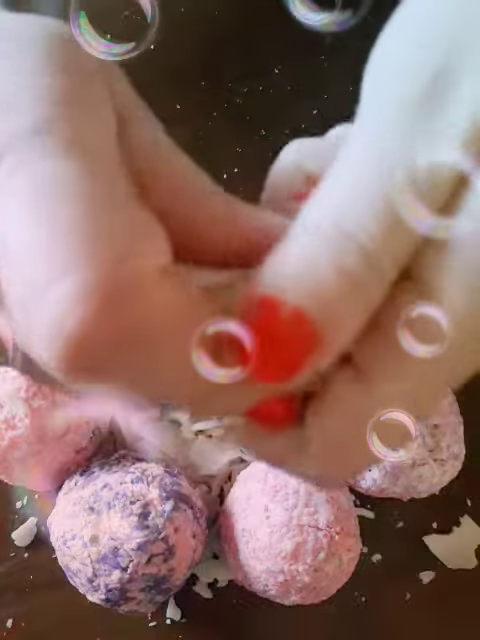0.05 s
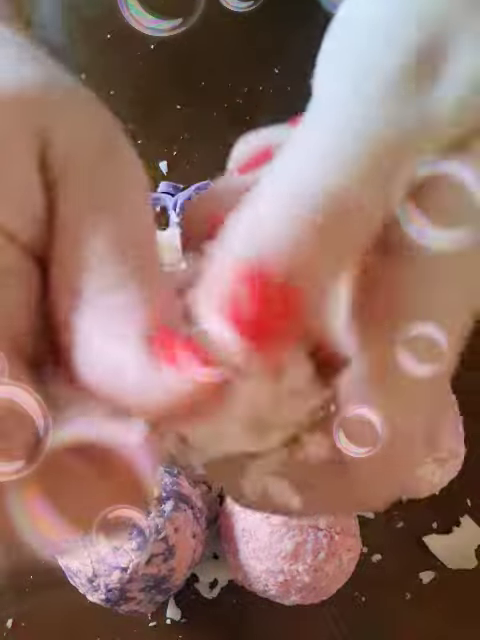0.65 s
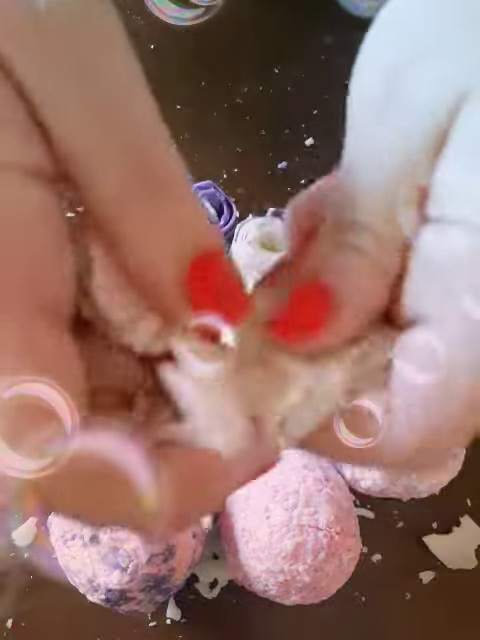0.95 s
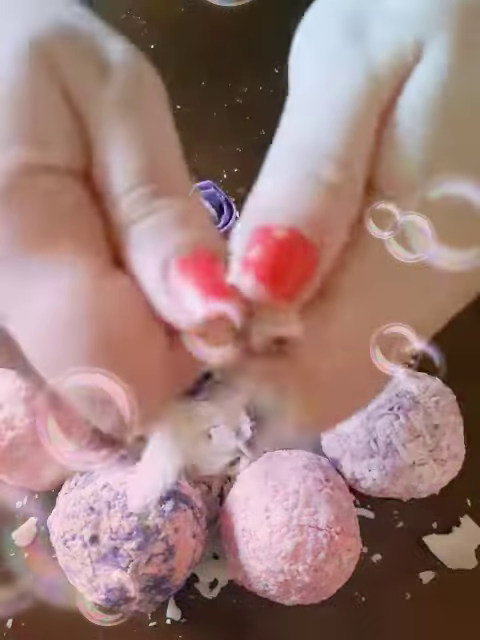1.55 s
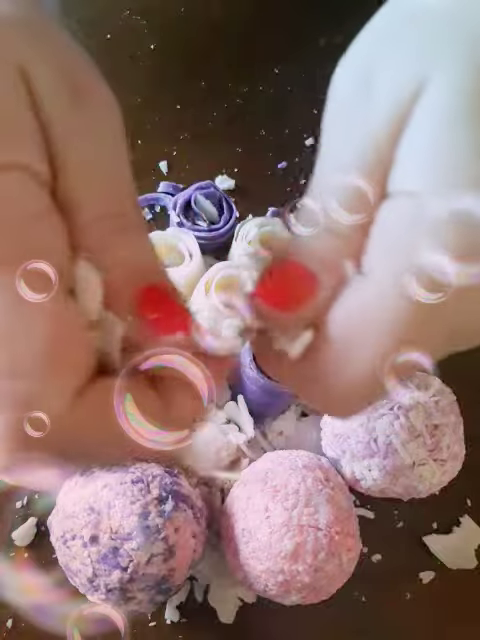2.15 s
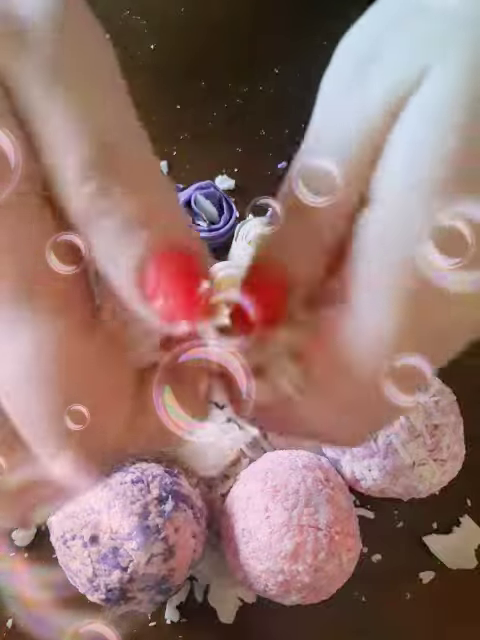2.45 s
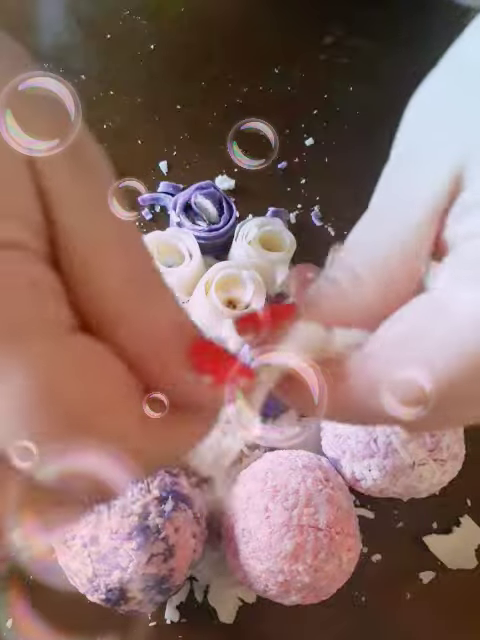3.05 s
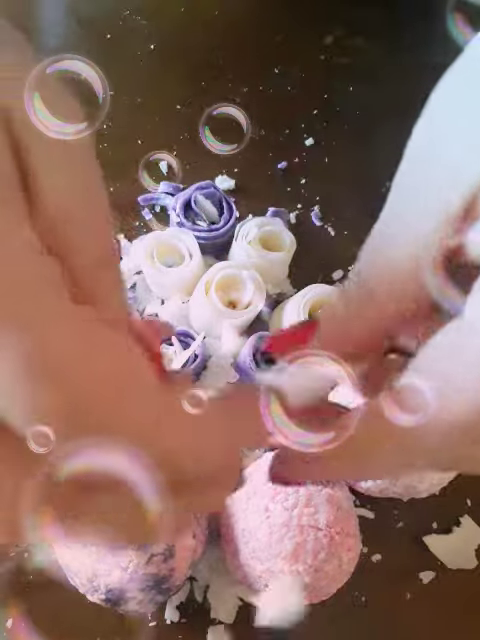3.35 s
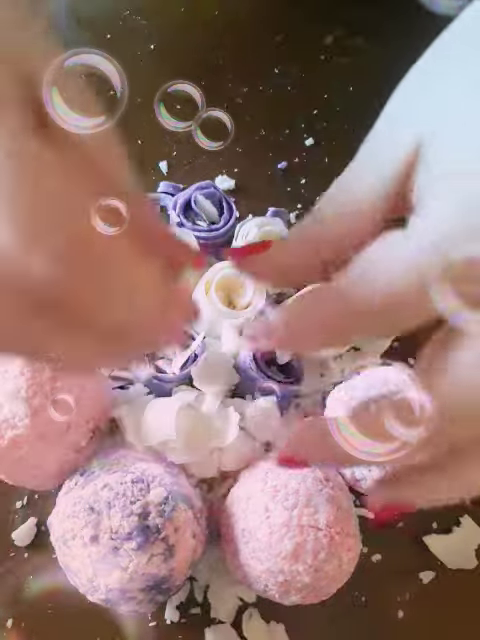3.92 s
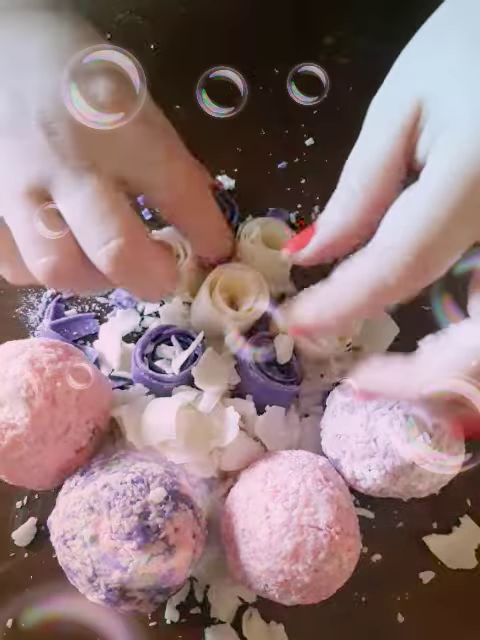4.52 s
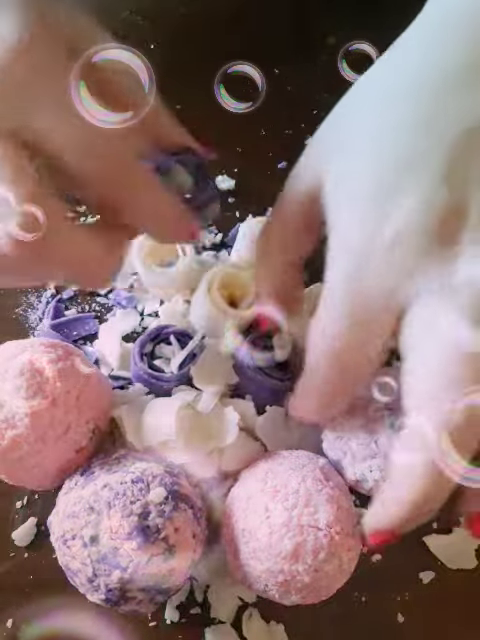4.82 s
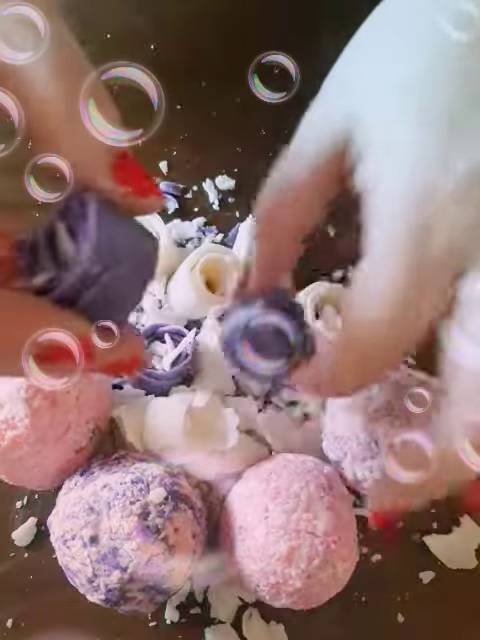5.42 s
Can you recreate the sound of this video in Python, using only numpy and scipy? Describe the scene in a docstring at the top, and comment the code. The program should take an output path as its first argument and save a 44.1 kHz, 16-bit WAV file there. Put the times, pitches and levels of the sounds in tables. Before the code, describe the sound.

Dry soap curls are crushed between fingers close to the microphone in a small, quiet room with almost no echo. It begins with faint rubbing and a few small ticks. At about 0.9 seconds crisp snapping starts, with a sharp crack near 1 second, and dense crackling and crunching continues in repeated squeezes. Skin hisses softly over the soap, and pieces knock dully on the table, most clearly at about 1.6 seconds. The crumbling eases slightly from 2 to 3 seconds, then sharper snaps and several light knocks come between 3.1 and 3.9 seconds. After that it is much quieter. From 4.1 to 4.4 seconds a soap ball scrapes along the table with a small knock, then rocks to rest with soft, low bumps around 4.6 seconds. From 4.8 seconds fingers rustle among the curls with a few faint ticks, fading by about 5.6 seconds.

```python
"""Dry soap curls snap and crumble as fingers crush them close to a microphone.
Each brittle fracture excites the resonances of a thin shell; crumbs break in clumps under pressure,
skin rubs and hisses, and dull knocks ring the table. Then a soap ball scrapes along the table and
settles, and the fingers rustle among the curls. A small, quiet room answers faintly; the sound is mono."""
import sys
import numpy as np
from scipy import signal
from scipy.fft import rfft, irfft, next_fast_len
from scipy.io import wavfile

SR = 44100
rng = np.random.default_rng(int(sys.argv[2]) if len(sys.argv) > 2 else 0)


def wav_out(sig):
    """Save sig, one row per channel (or a flat mono array), as 16-bit PCM at SR to the path in sys.argv[1]."""
    wavfile.write(sys.argv[1], SR, np.round(np.clip(np.atleast_2d(sig).T, -1, 1) * 32767).astype(np.int16))


N = 250488
FRAME = 2048  # samples in one fracture or filter response
ONSET = FRAME // 4  # sample of that frame at which a shell breaks

# modes of the table top: (frequency [Hz], relative level [dB], decay time T60 [s])
TABLE_MODES = [(140.5, -6.5, 0.29), (260.4, -10, 0.21), (274.8, 1.5, 0.27), (495.2, 2, 0.16)]
# spectrum of fine soap dust: (frequency [Hz], relative level [dB])
DUST_SPECTRUM = [(2500, -33), (4500, 9), (5500, -3), (7500, -1), (8700, -16.5), (12000, -10), (16000, -6)]
# texture under the fingers: (time [s], rub weight [dB], flake weight [dB], dust weight [dB])
TEXTURE = [(0, 6.5, 6, 5), (.7, -3.5, -14, 0), (1.3, -2, -2, 1.5), (3.8, -2, -2.5, -0.5),
           (4.5, -0.5, -1.5, 2), (4.88, 3, 3.5, -8), (5.6, 1.5, 4, 1)]


def amp(db):
    """Amplitude grows tenfold every 20 dB."""
    return 10 ** (np.asarray(db) / 20)


def unit(x):
    """Normalisation to an rms of 1."""
    return x / np.sqrt(np.mean(x ** 2) + 1e-20)


def along(points, hz):
    """Interpolation of (frequency [Hz], value) points on a logarithmic axis."""
    freqs, values = np.transpose(points)
    return np.interp(np.log(hz + 1), np.log(freqs + 1), values)


def curves(rows):
    """Linear interpolation in time: one envelope for each column after the first."""
    times, *columns = np.transpose(rows)
    return [np.interp(np.arange(N) / SR, times, column) for column in columns]


def wobble(knots_per_s):
    """Random modulation: a curve drifts between Gaussian knots."""
    knots = rng.standard_normal(int(N * knots_per_s / SR) + 2)
    return np.interp(np.arange(N) * knots_per_s / SR, np.arange(len(knots)), knots)


def add(track, start_s, x):
    """Superposition: x joins the track at start_s."""
    i = max(0, round(start_s * SR))
    track[i:i + len(x)] += x[:max(0, len(track) - i)]


def coloured(x, spectrum):
    """Minimum-phase filtering by (frequency [Hz], gain [dB]) points."""
    gain = amp(along(spectrum, np.fft.rfftfreq(FRAME, 1 / SR)))
    cepstrum = irfft(np.log(gain))
    cepstrum[1:FRAME // 2] *= 2
    cepstrum[FRAME // 2 + 1:] = 0
    return signal.oaconvolve(x, irfft(np.exp(rfft(cepstrum))))[:len(x)]


def resonant(x, hz, q):
    """Forced response of one damped resonator; q is held at 1 or more."""
    return signal.lfilter(*signal.iirpeak(min(hz, SR / 3), max(q, 1), SR), x)


def ring(modes, attack_s, scatter_db):
    """Free vibration: a struck body sounds as a sum of exponentially decaying modes."""
    t = np.arange(SR // 2) / SR
    waves = sum(amp(db + rng.normal(0, scatter_db) - 60 * t / t60) * np.sin(2 * np.pi * hz * t)
                for hz, db, t60 in modes)
    return waves * (1 - np.exp(-t / attack_s))


def grains(per_s, hz, spread, cycles, size_db):
    """Shot noise: tiny breaks at random times, each a heavily damped wave at its own pitch."""
    count = int(per_s * N / SR)
    when, strength, place, phase = rng.random((count, 4), np.float32).T
    pitch = hz * np.exp(spread * (2 * place - 1))[:, None]
    t = np.arange(128, dtype=np.float32) / SR
    age = t * pitch / cycles
    size = amp(size_db * np.minimum(-np.log(1 - strength), 3.6))
    envelope = size[:, None] * np.sqrt(pitch) * age * np.exp(-age)
    waves = envelope * np.sin(2 * np.pi * (pitch * t + phase[:, None]))
    index = (when * N).astype(int)[:, None] + np.arange(len(t))
    return unit(np.bincount(index.ravel(), waves.ravel(), N)[:N])


def hush():
    """Ambient noise: a steady random background, strongest in the bass."""
    # spectrum of the quiet room: (frequency [Hz], relative level [dB])
    spectrum = [(25, -18.5), (105, 5.5), (210, 4), (390, -10.5), (510, -9.5), (700, -16.5), (2200, -24.5),
                (4400, -20.5), (7500, -21.5), (16000, -29.5)]
    return amp(-62) * unit(coloured(rng.standard_normal(N), spectrum))


def reverberation(x):
    """Wall reflections build into a diffuse tail, in which the top treble dies first."""
    # reverberation of the room: (frequency [Hz], decay time T60 [s])
    decay_times = [(150, 0.3), (1500, 0.096), (5000, 0.13), (14000, 0.03)]
    hz, t, noise = signal.stft(rng.standard_normal(SR // 2), SR, nperseg=256)
    decay = amp(-60 * t / along(decay_times, hz)[:, None])
    tail = signal.istft(noise * decay, SR, nperseg=256)[1]
    tail *= 1 - np.exp(-np.arange(len(tail)) / SR / 0.042)
    return signal.fftconvolve(x, tail / np.linalg.norm(tail))[:N]


def ball():
    """Friction and soft impact: a rough soap ball scrapes along the table, then rocks to rest."""
    # envelope of the slide: (time [s], level [dB])
    slide = [(4.10, -109), (4.14, -56), (4.20, -48.5), (4.27, -57.5), (4.31, -46), (4.35, -64), (4.39, -85)]
    # spectrum of the scrape: (frequency [Hz], relative level [dB])
    spectrum = [(70, -39), (150, 12.5), (400, 3), (700, -10), (1500, -12.5), (2200, -20), (5000, -64)]
    # bumps of the settling ball: (time [s], level [dB])
    bumps = [(4.569, -32), (4.589, -34), (4.619, -29), (4.633, -32), (4.669, -33), (5.139, -38)]
    # table modes under a soft weight: (frequency [Hz], relative level [dB], decay time T60 [s])
    loaded_modes = [(64.1, -19.5, 0.64), (106, -11, 0.18), (148, -3, 0.11), (206.6, -6, 0.078)]
    roughness = grains(per_s=1400, hz=1180, spread=0.69, cycles=0.42, size_db=-0.5)
    out = amp(curves(slide)[0]) * unit(coloured(roughness, spectrum))
    for start, db in bumps:
        add(out, start, amp(db) * ring(loaded_modes, attack_s=0.00445, scatter_db=2))
    return out


def knocks():
    """Impact excitation: a strongly damped thud leaves the table's modes ringing faintly."""
    # a curl gives way or a piece meets the table: (time [s], relative level [dB], frequency [Hz])
    impacts = [(.863, -39.5, 343), (1.243, -35, 280), (1.635, -17, 262), (1.646, -24, 262),
               (1.691, -24.5, 255), (1.778, -34, 490), (1.86, -33, 510), (2.151, -35, 280),
               (3.145, -29.5, 287), (3.293, -29.5, 285), (3.318, -28, 270), (3.460, -25.5, 510),
               (3.491, -34, 502), (3.618, -36, 286), (4.299, -28.5, 456.5)]
    out = np.zeros(N)
    for start, db, hz in impacts:
        thud_modes = [(0.58 * hz, -7, 0.045), (hz, 0, 0.045), (1.9 * hz, -15, 0.025)]
        thud = ring(thud_modes, attack_s=0.0016, scatter_db=2)
        table = ring(TABLE_MODES, attack_s=0.011, scatter_db=5.5)
        add(out, start, amp(db) * (thud + amp(-19) * table))
    return coloured(out, [(50, -9), (150, -1.5)])


def swishes():
    """Friction noise: sliding skin hisses, coloured by the cavity resonance of the hands."""
    # skin slides over soap: (start [s], end [s], relative level [dB], resonance [Hz])
    strokes = [(0.51, 0.79, -59, 2230), (1.294, 1.5, -57.5, 2700), (1.995, 2.144, -60.5, 2250),
               (2.99, 3.13, -55, 2690)]
    out = np.zeros(N)
    for start, end, db, hz in strokes:
        skin = rng.standard_normal(max(FRAME, int((end - start) * SR)))
        hollow = unit(resonant(resonant(skin, hz, q=3.4), hz, q=3.6))
        hiss = hollow + amp(-1.5) * unit(coloured(skin, DUST_SPECTRUM))
        add(out, start, amp(db - 1.5) * hiss * np.sqrt(np.hanning(len(skin))))
    return out


def grinding_level():
    """Powers add: light contact and squeezes sum to the level [dB] at which the fingers grind."""
    # light contact of the moving hands: (time [s], level [dB])
    contact = [(0, -64), (.24, -77), (.34, -64.5), (.46, -74.5), (.62, -62.5), (.83, -62.5), (1.08, -56.5),
               (1.55, -63), (2.1, -61.5), (2.5, -60.5), (3.0, -61), (3.6, -63.5), (4.15, -62.5),
               (4.42, -70.5), (4.78, -72.5), (4.83, -56), (5.08, -58.5), (5.3, -64.5), (5.67, -73.5)]
    # fingers press on the curls: (start [s], time held [s], level [dB])
    squeezes = [(0.574, 0.18, -63.5), (.851, 0.012, -53), (.958, 0.06, -50), (1.188, 0.11, -53.5),
                (1.428, 0.04, -53), (1.572, .1, -53.5), (1.69, .18, -50.5), (2.133, 0.09, -56),
                (2.375, 0.02, -48.5), (2.553, 0.03, -56), (2.667, 0.09, -52.5), (2.8, 0.025, -49),
                (2.875, 0.1, -56), (3.128, 0.03, -50), (3.245, 0.04, -50), (3.359, 0.14, -49),
                (3.614, 0.17, -52)]
    bite_s, release_db_per_s = 0.008, 240
    t = np.arange(N) / SR
    power = amp(curves(contact)[0]) ** 2
    for start, held, db in squeezes:
        bite = np.clip((t - start) / bite_s + 0.5, 0, 1)
        release_db = release_db_per_s * np.clip(t - start - held, 0, 1)
        power += (bite * amp(db - release_db)) ** 2
    return 10 * np.log10(power)


def crumbling():
    """Crackling noise: a light touch only brushes the soap; a squeeze breaks crumbs in avalanches."""
    # spectrum of crumbs: (frequency [Hz], relative level [dB])
    crumb_spectrum = [(900, -13), (1550, -14), (2200, -0.5), (3000, -3.5), (4200, 0), (5500, -18.5),
                      (8000, -26)]
    # spectrum of coarse flakes: (frequency [Hz], relative level [dB])
    flake_spectrum = [(450, -23), (850, 0), (1300, 2), (2100, 2), (3200, -20.5)]
    # spectrum of the hands' dull rub: (frequency [Hz], relative level [dB])
    rub_spectrum = [(50, -32.5), (100, -21), (150, 1.5), (280, -2), (380, -3), (500, -3.5), (680, -28.5),
                    (2000, -43.5)]
    grind_db = grinding_level()
    rub_db, flake_db, dust_db = curves(TEXTURE)
    light_db, hard_db = -63, -54
    breaking = np.clip((grind_db - light_db) / (hard_db - light_db), 0.12, 0.93)
    clumps_db = (0.82 + breaking) * (5.1 * wobble(45) + 2.8 * wobble(190))
    clumps_db = np.minimum(clumps_db, 6)  # only so much soap lies under a fingertip

    def brushed(breaks, spectrum):
        """Equal-power mixing of breaks and friction noise."""
        mix = np.sqrt(breaking) * breaks + np.sqrt(1 - breaking) * rng.standard_normal(N)
        return unit(coloured(mix, spectrum))

    crumbs = brushed(grains(per_s=480, hz=2940, spread=0.96, cycles=0.313, size_db=2.5), crumb_spectrum)
    flakes = brushed(grains(per_s=900, hz=1600, spread=0.92, cycles=0.31, size_db=0.5), flake_spectrum)
    dust = brushed(grains(per_s=1000, hz=9300, spread=0.36, cycles=0.65, size_db=4.5), DUST_SPECTRUM)
    grit = amp(clumps_db) * (crumbs + amp(flake_db) * flakes + amp(dust_db) * dust)
    # the rub carries into the table
    skin = rng.standard_normal(N)
    table = sum(amp(db) * resonant(skin, hz, q=10.4) for hz, db, _ in TABLE_MODES)
    rub = unit(coloured(skin + 0.85 * table, rub_spectrum))
    return amp(grind_db) * (amp(-4.5) * grit + amp(rub_db - 1.5 + 0.5 * clumps_db) * rub)


def fracture(run_s):
    """Brittle fracture: a creak, an impulse, splinters as the crack runs on, then dying debris."""
    def spray(envelope):
        """Log-normal amplitudes make jerky noise, here of unit energy."""
        jerks = rng.standard_normal(FRAME) * np.exp(1.21 * rng.standard_normal(FRAME))
        return unit(jerks * envelope) / np.sqrt(FRAME)

    t = (np.arange(FRAME) - ONSET) / SR
    run_s, fade_s = max(run_s, 2 / SR), 0.0024
    creak = spray((t < 0) * np.exp(-abs(t) / fade_s))
    splinters = spray((t >= 0) * np.exp(-(t / (1.13 * run_s)) ** 4))
    debris = spray((t >= 0) * (1 + abs(t) / fade_s) ** -1.6)
    spray_gain = amp(-14) * np.sqrt(run_s * SR)  # a longer crack splinters more
    return (t == 0) + spray_gain * (amp(-14) * creak + splinters + amp(-10) * debris)


def snap(hz, run_s, crack_db):
    """Shell resonance: a fracture rings its piece at its own pitch and radiates a broadband crack."""
    # spectrum of the whole curl: (frequency [Hz], relative level [dB])
    curl_spectrum = [(300, -20), (1400, -1), (2200, 3.5), (4300, 1), (5600, -11.5), (12000, -23)]
    # spectrum of the crack: (frequency [Hz], relative level [dB])
    crack_spectrum = [(600, -19.5), (1400, -3), (4500, 1.5), (7500, -2), (9000, -4), (12000, -5),
                      (16000, -8.5)]
    force = fracture(run_s)
    tone = unit(resonant(resonant(force, hz, q=11.4), hz, q=1))
    curl_modes_hz = 1150 * 6.34 ** rng.random(size=4)  # no two curls are alike
    shaken = force + 1.98 * sum(resonant(force, mode_hz, q=19) for mode_hz in curl_modes_hz)
    coupling = amp(-2) * min(1, (3500 / hz) ** 3.3)  # large, low pieces shake the curl most
    curl = coupling * unit(coloured(shaken, curl_spectrum))
    crack = unit(coloured(shaken, crack_spectrum))
    sound = unit(unit(tone + curl) + amp(crack_db) * crack)
    return np.sqrt(0.01 * SR / FRAME) * sound  # the energy of 10 ms at an rms of 1


def chips():
    """Acoustic emission: above a threshold, random chips tick, louder with more pressure and dust."""
    chances_per_s, threshold_db = 44, -62
    grind_db, dust_db = grinding_level(), curves(TEXTURE)[2]
    out = np.zeros(N)
    for when, strength, pitch in rng.random((int(chances_per_s * N / SR), 3)):
        i = int(when * N)
        if grind_db[i] > threshold_db:
            chip = snap(hz=3700 * 2 ** (2 * pitch - 1), run_s=0.0006, crack_db=13)
            add(out, (i - ONSET) / SR, amp(grind_db[i] + dust_db[i] + 6) * strength * chip)
    return out


def snaps():
    """Release of elastic energy: the curls break, one thin shell after another."""
    # shells break: (time [s], relative level [dB], pitch [Hz], crack run time [s], crack weight [dB])
    breaks = [(0.3421, -52.5, 2370, 0.0015, 7), (0.5804, -41, 7150, 0.00057, -1),
              (0.6393, -48.5, 2230, 0.00406, 11), (0.863, -31.0, 5600, 0.0055, 5),
              (0.8886, -44, 2200, 0.00053, -9), (0.9418, -40.5, 6130, 0.0005, -5),
              (0.9466, -35.5, 6120, 0.0011, -2), (0.971, -24.5, 3670, 0.0028, 11),
              (0.9903, -36, 3100, 0.00025, -1), (0.9976, -37, 3480.0, 0.0056, 2.0),
              (1.0063, -36.0, 4700, 0.00197, 11), (1.1693, -41.5, 6240, 0.0018, 1),
              (1.2037, -33.5, 4160, 0.0018, 3), (1.232, -34.5, 4100, 0.00133, -5),
              (1.2453, -30.5, 2260, 0.0003, -17), (1.2699, -33, 2250, 0.0065, -20),
              (1.2903, -33.5, 2190, 0.004, -28), (1.348, -45.0, 2280, 0.00087, -24),
              (1.442, -36, 4500, 0.0031, 18), (1.5224, -46.5, 2630, 0.0002, -3),
              (1.572, -40.5, 2070.0, 0.0094, 5), (1.597, -42, 1930, 0.0021, 2),
              (1.6339, -31.5, 6200, 0.0023, 1), (1.654, -34.0, 2230, 0.00335, -4),
              (1.6889, -37.5, 1917, 0.0062, -10), (1.7126, -39.5, 4110.0, 0.0027, -4.0),
              (1.7564, -35.5, 2207, 0.0038, -16), (1.7939, -29.5, 4320.0, 0.0041, 22),
              (1.8598, -38.5, 2550, 0.0038, 2), (1.8976, -40, 3980, 0.0012, -8.0),
              (2.0372, -44, 6770.0, 0.0077, 15), (2.1365, -35.0, 4000, 0.00488, -5.5),
              (2.1501, -37.5, 2330.0, 0.00055, -22), (2.1752, -37.5, 2680, 0.00226, 0),
              (2.3914, -45.5, 3990, 0.0058, -13), (2.4284, -41.0, 3260, 0.0017, -7),
              (2.561, -44, 4190, 0.018, 6), (2.6983, -44.5, 3140.0, 0.0082, 1.5),
              (2.7258, -45.5, 1180.0, 0.0049, -6), (2.743, -45, 6820, 0.0022, -5.5),
              (2.7896, -40.5, 2390, 0.0007, -21), (2.8175, -42, 2640, 0.009, -4),
              (2.8298, -40.5, 1480, 0.0028, 5.5), (2.8815, -38.5, 3890, 0.0024, 0),
              (2.9317, -46.5, 6500, 0.0019, 5), (2.9449, -43.5, 3090.0, 0.0066, 1),
              (3.1312, -46, 6770.0, 0.0044, 8), (3.1449, -39, 1760, 0.0092, -6.0),
              (3.1512, -40, 8000, 0.0045, 9), (3.2616, -44.5, 1910.0, 0.0038, 9),
              (3.2945, -32.5, 1950, 0.00052, -16.0), (3.3158, -45.5, 1900, 0.0018, -9.5),
              (3.3877, -34, 3040.0, 0.00095, -2.5), (3.4122, -41, 2440, 0.0004, -25),
              (3.4433, -29, 2278, 0.00013, -23), (3.4595, -31, 2330, 0.0035, -8),
              (3.4691, -36.5, 2390, 0.00158, -16), (3.4847, -35.0, 2000.0, 0.0045, 0.5),
              (3.503, -42.0, 6470, 0.0053, -21), (3.653, -41.5, 2890.0, 0.0035, -1),
              (3.6812, -36, 3070, 0.0039, -2), (3.689, -37.5, 1540, 0.00039, 0.5),
              (3.699, -40.5, 6900, 0.00027, -2), (3.7339, -34.5, 3200.0, 0.0059, 11),
              (3.7976, -45.5, 6550.0, 0.0077, 5), (3.88, -36, 2090, 0.002, 21),
              (4.0516, -49, 7500.0, 0.00069, 7), (4.2976, -46, 1940.0, 0.0086, 0.0),
              (4.9206, -50.5, 2054, 0.0014, -8), (4.9295, -49.5, 1460.0, 0.0044, 9),
              (5.3666, -46.0, 2310, 0.0048, -17), (5.4203, -46.5, 2950, 0.0015, -1)]
    out = np.zeros(N)
    for when, db, hz, run_s, crack_db in breaks:
        add(out, when - ONSET / SR, amp(db + 0.16) * snap(hz, run_s, crack_db - 2))
    return out


def scene():
    """Direct sound, faint reverberation and ambient noise superpose, alike in both channels."""
    direct = snaps() + chips() + crumbling() + swishes() + knocks() + ball()
    mono = hush() + direct + amp(-18.5) * reverberation(direct)
    return np.array([mono, mono])


def record(dry):
    """Frequency response: the microphone sheds deep bass and top treble, and its port cuts a notch."""
    bass_hz, top_hz = 40, 15950
    notch_hz, notch_half_width_hz, notch_db = 9687, 750.5, -11.5
    size = next_fast_len(N + FRAME)
    hz = np.fft.rfftfreq(size, 1 / SR)
    lean = signal.sosfilt(signal.butter(3, bass_hz, "high", fs=SR, output="sos"), dry)
    port = amp(notch_db * np.exp(-((hz - notch_hz) / notch_half_width_hz) ** 2))
    band_limit = 1 / np.sqrt(1 + (hz / top_hz) ** 160)
    return irfft(rfft(lean, size) * port * band_limit, size)[:, :N]


dry = scene()
out = record(dry)
wav_out(out)
```